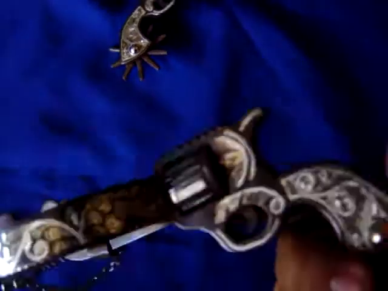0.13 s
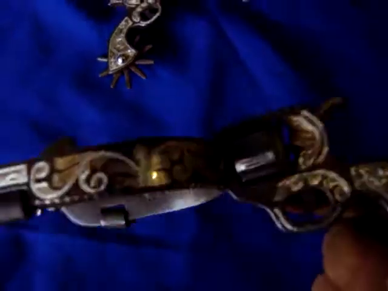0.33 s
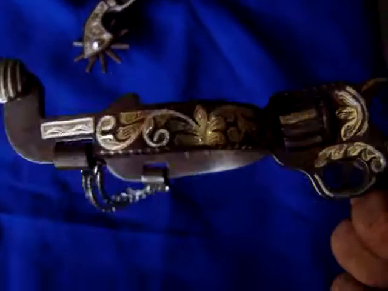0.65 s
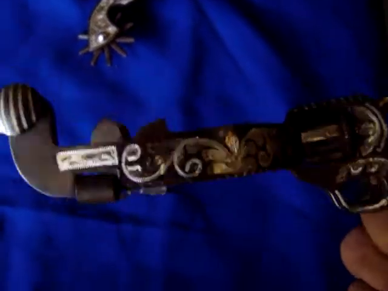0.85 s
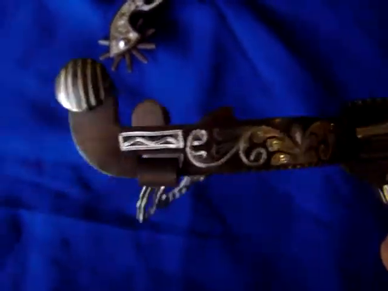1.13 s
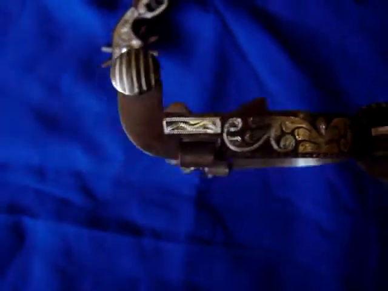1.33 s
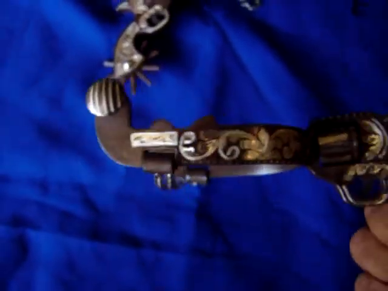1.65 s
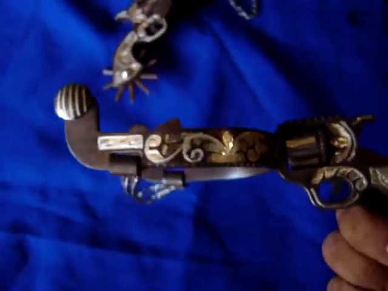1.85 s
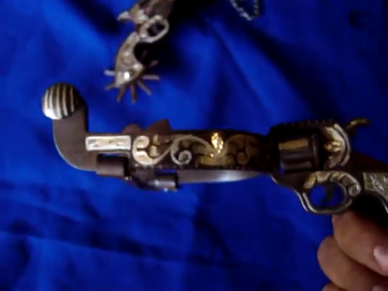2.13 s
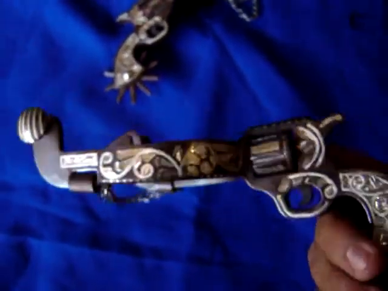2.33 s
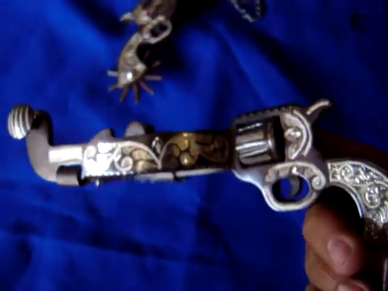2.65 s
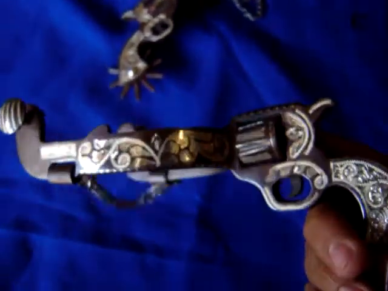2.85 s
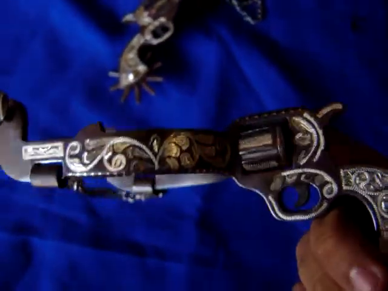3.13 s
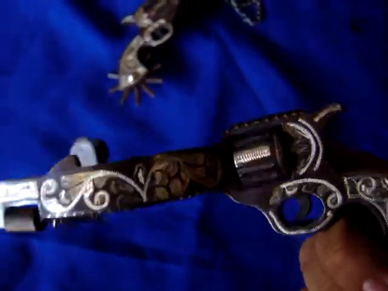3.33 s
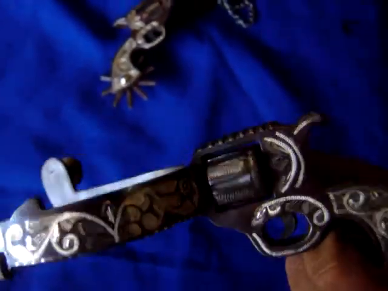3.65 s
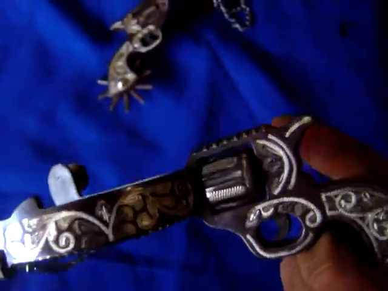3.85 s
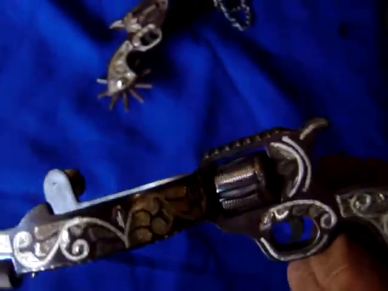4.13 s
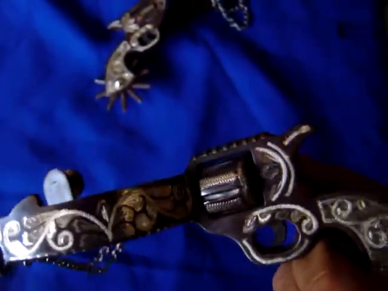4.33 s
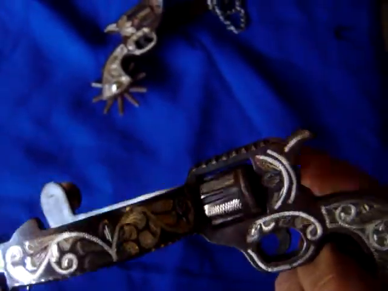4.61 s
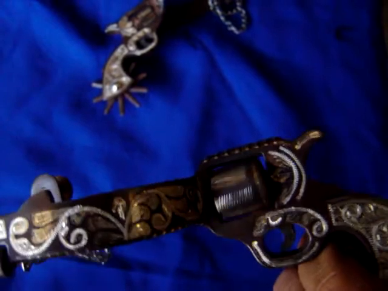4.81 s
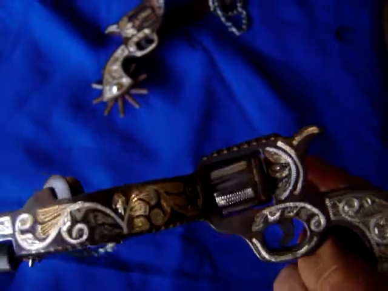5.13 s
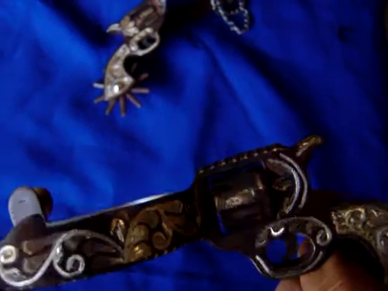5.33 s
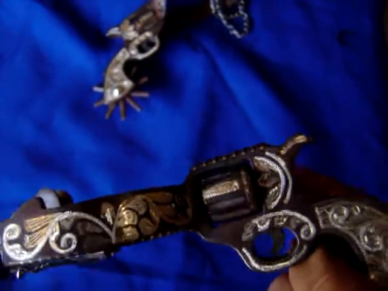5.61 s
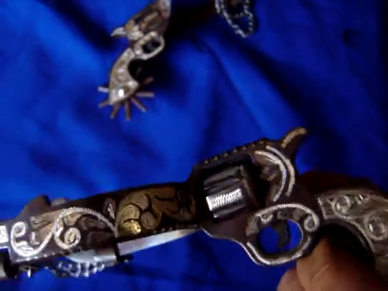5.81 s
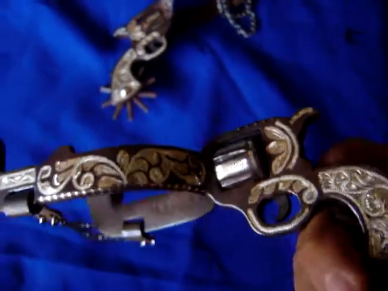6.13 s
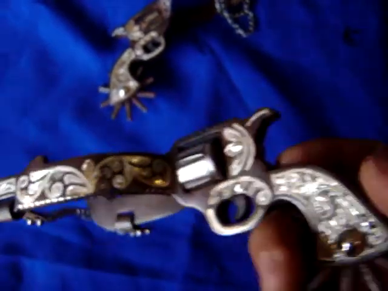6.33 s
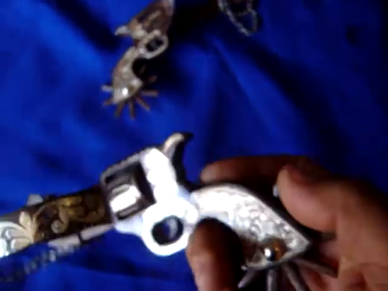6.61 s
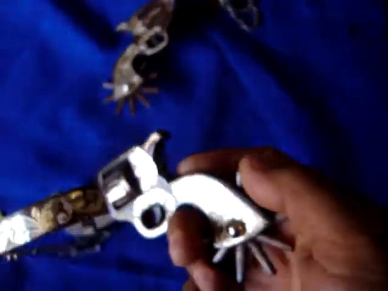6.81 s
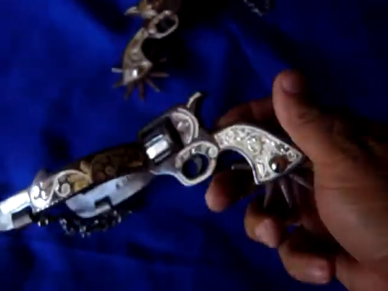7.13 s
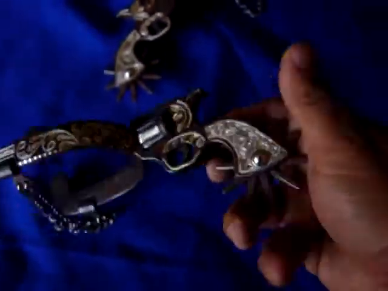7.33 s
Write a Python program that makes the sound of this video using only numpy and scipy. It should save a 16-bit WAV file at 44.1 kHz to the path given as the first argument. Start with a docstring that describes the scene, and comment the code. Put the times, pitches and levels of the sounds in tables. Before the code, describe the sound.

Close to the microphone, a small iron spur is turned in the hand: sharp dry clicks, short scrapes and thin chain ticks. Outside, a vehicle's low steady hum sags, swells, then fades and sinks slightly in pitch over soft road noise. Clicks grow denser midway, with tiny squeaks from the hinge. Near the end a distant bird warbles, the hand bumps softly, and the spur's toothed wheel rattles and knocks.

```python
"""Spur in the hand, vehicle leaving

An iron spur is turned in the hand: its hinged strap plate knocks, scrapes and squeaks on the heel band, a small
chain ticks, the rowel rattles, and the hand bumps it once; decaying modes ring at each metal contact. Outside,
multiples of an engine's cycle drone and fade, sinking in pitch, over road noise shaped from white noise.
Near the end a distant bird warbles in nearly pure, arching tones."""
import sys
import numpy as np
from scipy import signal
from scipy.fft import rfft, irfft
from scipy.io import wavfile
from scipy.ndimage import uniform_filter1d

SR = 44100
rng = np.random.default_rng(int(sys.argv[2]) if len(sys.argv) > 2 else 0)


def output_pcm(signal):
    """Save a mono or channel-first signal as 16-bit PCM at the path in sys.argv[1].

    Samples are clipped to [-1, 1] before scaling.
    """
    pcm = np.clip(np.atleast_2d(signal).T, -1, 1) * 32767
    wavfile.write(sys.argv[1], SR, np.round(pcm).astype(np.int16))


N = 329427
T = np.arange(N) / SR

# the engine's weaker multiples: (frequency [Hz], level [dB re the road level])
ENGINE_SPECTRUM = [(85, -16.5), (125, -6), (150, -21.5), (210, -3.5), (270, -4.5), (320, -9), (410, -13.5),
                   (470, -20), (800, -26.5)]
# brief dips of the drone, applied twice: (time [s], half the depth [dB], half-width at 1/e [s])
DRONE_DIPS = [(.92, 3.5, 0.032), (1.07, 3, 0.018), (1.259, 3, .04), (4.01, 17, 0.025), (4.54, 2.5, 0.076)]
# road level of the vehicle: (time [s], level [dB])
ROAD_LEVEL = [(0.0, -40.5), (1.91, -48.5), (4.74, -53), (7.47, -54.5)]
# road noise: (frequency [Hz], third-octave level [dB re the road level])
ROAD_SPECTRUM = [(30, -34), (55, -19.5), (150, -11.5), (200, 3.5), (280, 0.5), (480, -13), (800, -6),
                 (1300, -12.5), (2200, -18.5), (5000, -24), (10000, -33.5)]
# steady room tone and hiss: (frequency [Hz], third-octave level [dB])
ROOM_SPECTRUM = [(25, -76), (45, -62.5), (130, -60.5), (280, -61.5), (500, -59), (800, -63.5),
                 (1500, -65.5), (2500, -68), (5000, -69.5), (10000, -71.5)]

# modes of the heel band, the chain and the rowel: (frequency [Hz], level [dB], decay by 60 dB [s])
HEEL_BAND_MODES = [(1200, 8, 0.012), (2040, -1.5, 0.016), (2744, 0.5, 0.014), (3020, -0.5, 0.021),
                   (3424, -2, 0.012), (4200, -5, 0.014), (4540, -1.5, .012), (4950, -6.5, 0.02),
                   (5670, -6, 0.026), (6400, -8, 0.0089), (6790, -1.5, 0.021), (7250, -2.5, 0.014),
                   (8000, -5, 0.014), (8700, -5.5, 0.008), (9350, -1, 0.02)]
CHAIN_LINK_MODES = [(5690, 0.5, 0.078), (6400, -16.5, 0.031), (8000, -1, 0.049), (8130, -0.5, 0.037),
                    (8800, -16.5, 0.052), (9400, -3.5, 0.036), (9800, -2.5, 0.033)]
ROWEL_WHEEL_MODES = [(1160, 4.5, 0.083), (1640, -2, .04), (2550, -1.5, 0.041), (3000, -10, .03),
                     (4450, 0, 0.034), (6420, 0, 0.057), (7364, -2, 0.05), (8270, -6, 0.043),
                     (9000, -2, .022), (9860, 2, 0.023)]

# strap plate on heel band: (time [s], peak level [dB], favoured pitch [Hz], focus [dB per octave])
PLATE_KNOCKS = [(.1755, -17, 8700, 9), (.1775, -28.5, 4300, 9), (.188, -28, 3570, 28),
                (.259, -36.5, 6790, 35), (.455, -28, 6790, 18), (.469, -30.5, 9300, 1),
                (.681, -40.5, 3020, 20), (1.199, -36.5, 2800, 4), (1.862, -36, 7000, 2.5),
                (3.12, -29.5, 4860, 16), (3.131, -32.5, 4000, 10), (3.27, -37.5, 6900, 8),
                (3.3435, -26, 3080, 12.5), (3.514, -41, 3020, 24), (3.665, -32.5, 4930, 24),
                (3.667, -35, 9350, 30), (3.674, -36, 6700, 3), (4.0585, -31, 6400, 55),
                (4.166, -35, 4970, 0), (4.594, -29.5, 3500, 0), (4.7995, -29.5, 3350, 30),
                (4.8975, -26.5, 7500, 12), (4.945, -40.5, 3020, 30), (5.27, -35.5, 5030, 4),
                (5.364, -32, 8340, 25), (5.38, -29.5, 3020, 15), (5.4505, -26.5, 3930, 11),
                (5.642, -33, 9300, 51), (5.6585, -16.5, 5740, 9.5), (5.671, -52, 8500, -2),
                (5.6875, -29.5, 8500, 3), (5.748, -38.5, 4900, 39), (5.8105, -27, 8300, 4.5),
                (5.825, -39, 6600, 14), (6.907, -26.5, 1200, 7), (7.329, -27.5, 2200, 3)]
# the plate shifts under the fingers in sparse, faint grains:
# (time [s], length [s], peak level [dB], favoured pitch [Hz], focus [dB per octave])
PLATE_RUSTLES = [(.198, 0.036, -44, 9200, 20), (.34, 0.49, -41.5, 6600, 4), (2.89, .12, -51, 4070, 47),
                 (4.09, 0.13, -48, 8000, 5.2)]
# the plate scrapes on its hinge and along the band: same columns as the rustles
PLATE_SCRAPES = [(.42, 0.072, -38.5, 8460, 3), (3.385, 0.084, -38.5, 6000, -1.5),
                 (3.75, 0.079, -42, 6000, 6), (4.45, 0.088, -43.5, 8500, 3),
                 (4.906, 0.024, -32.5, 7450, 30), (4.946, 0.052, -42, 7360, 43),
                 (5.764, 0.027, -28, 7400, 7.5), (6.93, 0.044, -33.5, 1230, 7.5)]
# chain links touch: (time [s], peak level [dB], favoured pitch [Hz])
CHAIN_CONTACTS = [(.897, -31.5, 9400), (1.316, -33, 7600), (1.732, -31, 8000), (2.152, -39.5, 9060),
                  (5.775, -27, 9400), (5.79, -32, 5700), (5.803, -39, 5700), (6.073, -33.5, 8600)]
# one curve for each squeak of the binding hinge: (time [s], pitch [Hz], level [dB])
HINGE_SQUEAKS = [
    [(4.898, 7600, -47), (4.9005, 6880, -29), (4.903, 6400, -27.5), (4.91, 7250, -28), (4.918, 7830, -34),
     (4.932, 7070, -53), (4.945, 6000, -61)],
    [(5.778, 6720, -39), (5.786, 6740, -26), (5.794, 6660, -33.5)],
]
# bird notes: (middle time [s], length [s], pitch before the arch [Hz], level [dB])
BIRD_NOTES = [(6.217, 0.045, 1608, -58), (6.383, 0.1, 1606, -55.5), (6.553, 0.062, 1616, -52.5),
              (6.616, 0.12, 1623, -52), (6.702, 0.049, 1542, -49.5), (6.741, .05, 1820, -53.5),
              (6.976, 0.047, 1625, -56), (7.071, .05, 1512, -52.5), (7.107, 0.054, 1810, -57),
              (7.139, .05, 1330, -53.5), (7.188, .06, 1520, -55), (7.215, .05, 2020, -56),
              (7.232, .08, 1592, -50.5)]
# the rowel spins and chatters: same columns as the rustles
ROWEL_SPINS = [(7.095, 0.09, -49, 9000, 13), (7.132, 0.055, -41.5, 9800, 23),
               (7.199, 0.068, -29.5, 9800, 24), (7.362, 0.1, -42, 7400, 18)]
# the rowel knocks on its pin: (time [s], peak level [dB], favoured pitch [Hz])
ROWEL_KNOCKS = [(7.203, -35, 9800), (7.22, -32, 9800), (7.26, -35, 6400), (7.316, -20, 6370),
                (7.329, -35, 7364), (7.409, -35, 4800)]

# the engine's cycle rate sinks and settles as it draws away; the drone is its 16th multiple
CYCLE_NEAR_HZ, CYCLE_FAR_HZ, SETTLE_S = 11.75, 11.01, 2.78
# the drone holds while the vehicle is near, then dies down to a distant hum
DRONE_NEAR_DB, DRONE_FAR_DB, LEAVES_S, DRONE_FALL_DB_PER_S = -20.5, -44.5, 1.805, 8
SAG_DB, SAG_AT_S, SAG_WIDTH_S = 3, 0.81, 0.29  # it sags once and swells again before it leaves
# the next multiple up throbs against the drone and fades later
THROB_DB, THROB_HOLD_S, THROB_FALL_DB_PER_S = -40.5, 2.74, 2
CHAIN_FOCUS_DB, ROWEL_FOCUS_DB = 16.5, 7  # per octave
SWELL_SHARE = 0.05  # a rub swells for this share of its length, then dies away
ARCH_HZ, ARCH_S = 129, 0.0117  # rise of each bird note at its middle, and its half-width at 1/e
BUMP_S = 6.894
TOP_HZ = 10050


def undb(db):
    """Decibel law: level to amplitude gain."""
    return 10 ** (np.asarray(db) / 20)


def curve(rows):
    """Linear interpolation: a control joined by straight lines in time."""
    return np.interp(T, *np.transpose(rows))


def hold_and_fall(hold_s, db_per_s):
    """Exponential decay: a level in dB that stays at 0, then sinks steadily."""
    return -db_per_s * np.maximum(T - hold_s, 0)


def bells(rows):
    """Superposition: the sum of bell curves (time [s], height [dB], half-width at 1/e [s])."""
    return sum(db * np.exp(-((T - s) / width) ** 2) for s, db, width in rows)


def colour(points, hz):
    """Spectral envelope: gain interpolated in dB over log frequency."""
    f, db = np.transpose(points)
    return undb(np.interp(np.log(hz), np.log(f), db))


def noise(points):
    """Spectral shaping: white noise filtered to the given third-octave levels."""
    hz = np.maximum(np.fft.rfftfreq(N, 1 / SR), 15)
    third_hz = hz * (2 ** (1 / 6) - 2 ** (-1 / 6))
    gain = colour(points, hz) * np.sqrt(SR / 2 / third_hz)
    return irfft(rfft(rng.standard_normal(N)) * gain, N)


def walk(rate):
    """Smoothed chance: random levels held 1 / rate s and slewed, spread 1."""
    k = int(SR / rate)
    steps = np.repeat(rng.standard_normal(N // k + 1), k)
    y = uniform_filter1d(uniform_filter1d(steps, k), k)[:N]
    return y / y.std()


def add(out, s, sound):
    """Superposition: mix a sound in at time s."""
    i = int(s * SR)
    out[i:i + len(sound)] += sound[:N - i]


def peak(x, db):
    """Normalisation: scale a sound to a peak level."""
    return x * undb(db) / np.abs(x).max()


def room(x, wet_db, t60):
    """Reverberation: the direct sound and a diffuse, exponentially decaying tail from the walls."""
    t = T[:SR // 2]
    tail = rng.standard_normal(len(t)) * np.exp(-np.log(1000) * t / t60) * (t > .006)
    return x + undb(wet_db) * signal.fftconvolve(x, tail / np.linalg.norm(tail))[:N]


def ring(modes, hz, focus_db, detune, scatter_db=4.0, crack=0.54, crack_s=0.0031):
    """Modal excitation by one contact: modes near the favoured pitch ring most, over a brief crack."""
    t = T[:SR // 4]
    f, db, t60 = np.transpose(modes)
    size, shift, phase = rng.standard_normal((len(f), 3)).T
    gain = undb(db + scatter_db * size - focus_db * np.abs(np.log2(f / hz)))
    f = f * (1 + detune * shift)  # the grip loads the metal differently each time
    waves = np.sin(2 * np.pi * (f[:, None] * t + phase[:, None]))
    decays = np.exp(-np.log(1000) * t / t60[:, None])
    tone = gain @ (waves * decays)
    bins = np.fft.rfftfreq(len(t), 1 / SR) + 1  # + 1 Hz keeps the logarithm finite
    hiss_gain = undb(-focus_db * np.abs(np.log2(bins / hz)))
    hiss = irfft(rfft(rng.standard_normal(len(t))) * hiss_gain, len(t))
    burst = crack * hiss / hiss.std() * np.exp(-t / crack_s)
    onset = 1 - np.exp(-t / 0.00065)
    return (tone / np.linalg.norm(gain) + burst) * onset


def strikes(rows, modes, bounce_s, bounce_db, detune, count=3):
    """Repeated impact: a loose part chatters a few times, weaker at each rebound."""
    out = np.zeros(N)
    for s, db, hz, focus_db in rows:
        for k in range(count):
            add(out, s, peak(ring(modes, hz, focus_db, detune), db + k * bounce_db))
            s += bounce_s * rng.uniform(.6, 1.4)
    return out


def rubs(rows, modes, slip_rate, detune, grain_db=5, count=7):
    """Stick-slip friction: uneven tiny contacts swell and die away, shared among spots that ring differently."""
    out = np.zeros(N)
    for s, length, db, hz, focus_db in rows:
        gaps, sizes = rng.uniform(-1, 1, (200, 2)).T
        when = np.cumsum(1 + gaps) / slip_rate
        swell = np.interp(when / length, [0, SWELL_SHARE, 1], [.5, 1, .25], right=0)
        force = undb(grain_db * sizes) * swell
        spots = rng.integers(count, size=len(when))
        sound = 0
        for spot in range(count):
            slips = np.bincount((when * SR).astype(int), force * (spots == spot))
            sound = sound + signal.fftconvolve(slips, ring(modes, hz, focus_db, detune))
        add(out, s, peak(sound, db))
    return out


def same_focus(rows, focus_db):
    """Uniform selectivity: blows (time [s], level [dB], pitch [Hz]) all given one focus."""
    return [(*row, focus_db) for row in rows]


def engine(road_db, fade_db=3.0, uneven_db=4, wander=0.36, echo_db=-47, echo_shift=1.03):
    """Harmonic series of the engine cycle: the exhaust favours one multiple, and the weak ones fade separately."""
    cycle = CYCLE_FAR_HZ + (CYCLE_NEAR_HZ - CYCLE_FAR_HZ) * np.exp(-(T / SETTLE_S) ** 2)
    phase = 2 * np.pi * np.cumsum(cycle) / SR
    drone, throb = 16 * phase, 17 * phase

    sag_db = bells([(SAG_AT_S, SAG_DB, SAG_WIDTH_S)])
    near_db = DRONE_NEAR_DB - sag_db + hold_and_fall(LEAVES_S, DRONE_FALL_DB_PER_S)
    drone_gain = np.hypot(undb(near_db), undb(DRONE_FAR_DB))
    waver = undb(1.3 * walk(9))
    out = drone_gain * waver * np.sin(drone)
    throb_gain = undb(THROB_DB + hold_and_fall(THROB_HOLD_S, THROB_FALL_DB_PER_S))
    out += throb_gain * np.sin(throb + wander * walk(1.9))
    # a reflection from another direction arrives with a different Doppler shift
    echo_gain = undb(echo_db + road_db - road_db.mean() + fade_db * walk(2.3))
    out += echo_gain * np.sin(echo_shift * drone + 2 * walk(2.058))
    out *= undb(-2 * bells(DRONE_DIPS))

    for k in np.setdiff1d(np.arange(7, 54), [16, 17]):  # the weaker multiples
        level_db = road_db + uneven_db * (2 * rng.random() - 1) + fade_db * walk(2.11)
        gain = colour(ENGINE_SPECTRUM, k * cycle.mean()) * undb(level_db)
        out += gain * np.sin(k * phase + wander * walk(1.95) + 2 * np.pi * rng.random())
    return np.sqrt(2) * out  # makes the levels RMS


def road_noise(road_db):
    """Amplitude modulation: coloured noise follows the road level and flutters at random."""
    return noise(ROAD_SPECTRUM) * undb(road_db + 2.7 * walk(5.21))


def room_tone():
    """Stationary noise: a steady, coloured background."""
    return noise(ROOM_SPECTRUM)


def plate_knocks():
    """Impact with rebound: the strap plate rings the heel band's modes."""
    return strikes(PLATE_KNOCKS, HEEL_BAND_MODES, bounce_s=.0025, bounce_db=-12.0, detune=0.014)


def plate_friction():
    """Stick-slip friction: sparse slips rustle and dense slips scrape on the band's modes."""
    rustles = rubs(PLATE_RUSTLES, HEEL_BAND_MODES, slip_rate=130, detune=0.018)
    scrapes = rubs(PLATE_SCRAPES, HEEL_BAND_MODES, slip_rate=700, detune=0.034)
    return rustles + scrapes


def chain_ticks():
    """Impact with rebound: touching links ring high, short modes."""
    rows = same_focus(CHAIN_CONTACTS, CHAIN_FOCUS_DB)
    return strikes(rows, CHAIN_LINK_MODES, bounce_s=.005, bounce_db=-6.0, detune=0.011)


def squeaks(jitter=0.022, rough_db=3, rough_rate=900):
    """Friction-driven oscillation: the hinge sings a rough tone that slides with the pressure."""
    out = np.zeros(N)
    for rows in HINGE_SQUEAKS:
        s, hz, db = np.transpose(rows)
        pitch = np.interp(T, s, hz) * (1 + jitter * walk(rough_rate))
        gain = undb(np.interp(T, s, db) + rough_db * walk(rough_rate))
        sounding = (T > s[0]) * (T < s[-1])
        out += gain * sounding * np.sin(2 * np.pi * np.cumsum(pitch) / SR)
    return np.sqrt(2) * out


def bird():
    """Frequency modulation: nearly pure notes arch in pitch at their middle."""
    out = np.zeros(N)
    for s, length, hz, db in BIRD_NOTES:
        t = T[:int(length * SR)] - length / 2
        pitch = hz + ARCH_HZ * np.exp(-(t / ARCH_S) ** 2)
        swell = np.cos(np.pi * t / length)
        add(out, s - length / 2, undb(db) * swell * np.sin(2 * np.pi * np.cumsum(pitch) / SR))
    return np.sqrt(2) * out


def bump(hz=160, db=-17, tail_db=-30, tail_s=0.062):
    """Damped impulse: the hand gives one soft heavy push, with a dull band-passed shudder after it."""
    t, out = T[:SR // 4], np.zeros(N)
    push = np.sin(2 * np.pi * hz * t) * np.exp(-((t - .0038) / 0.002) ** 2)
    low_band = signal.butter(2, [35, 260], "band", fs=SR, output="sos")
    shudder = signal.sosfilt(low_band, rng.standard_normal(len(t)))
    tail = undb(tail_db) * shudder / shudder.std() * np.exp(-t / tail_s)
    add(out, BUMP_S, peak(push, db) + tail)
    return out


def rowel():
    """Friction and impact: the rowel chatters as it spins and knocks on its pin, ringing its own modes."""
    spins = rubs(ROWEL_SPINS, ROWEL_WHEEL_MODES, slip_rate=400, detune=.035)
    rows = same_focus(ROWEL_KNOCKS, ROWEL_FOCUS_DB)
    return spins + strikes(rows, ROWEL_WHEEL_MODES, bounce_s=.006, bounce_db=-3.5, detune=0.0083)


def scene():
    """Superposition: the spur close by, the vehicle and the bird far off."""
    road_db = curve(ROAD_LEVEL)
    outside = engine(road_db) + road_noise(road_db) + room(bird(), wet_db=-5.0, t60=1.0)
    spur = plate_knocks() + plate_friction() + chain_ticks() + squeaks() + bump() + rowel()
    return (outside + room(spur, wet_db=-28.0, t60=1.0) + room_tone())[None]


def record(dry):
    """Low-pass filtering: a steep elliptic filter removes the treble above TOP_HZ."""
    low_pass = signal.ellip(10, .2, 70, TOP_HZ, fs=SR, output="sos")
    return signal.sosfilt(low_pass, dry)


dry = scene()
out = record(dry)
output_pcm(out)
```